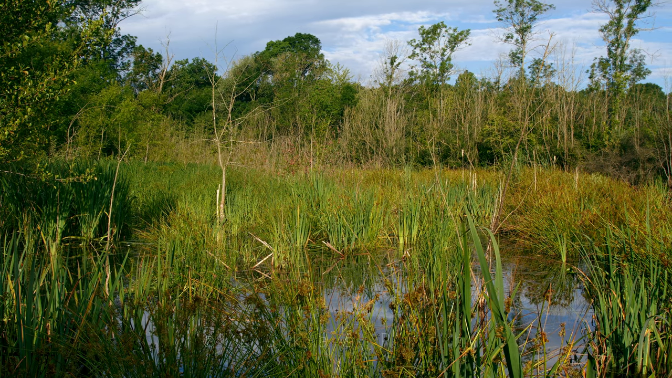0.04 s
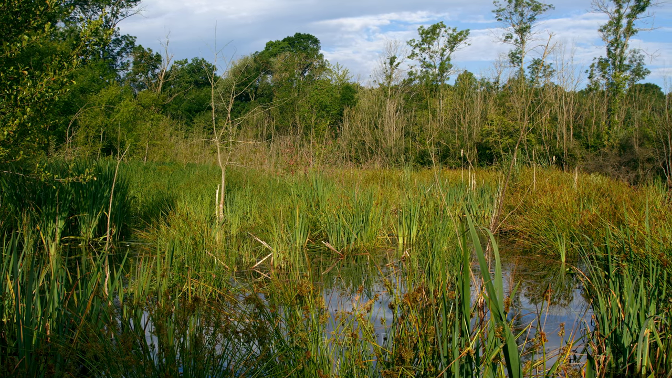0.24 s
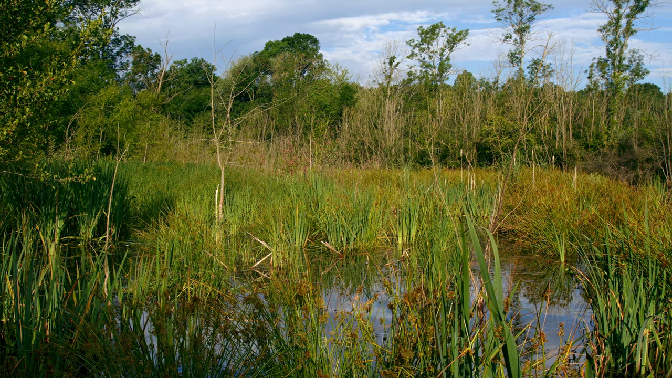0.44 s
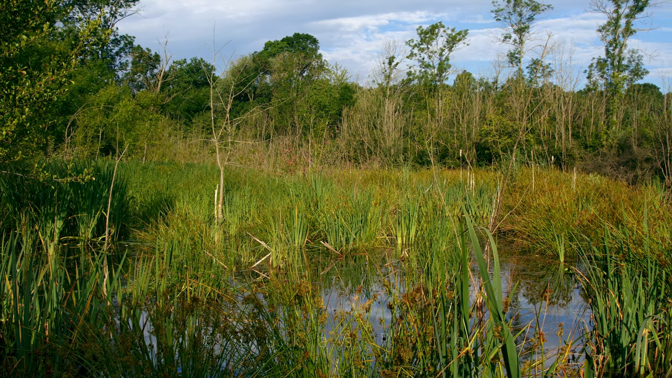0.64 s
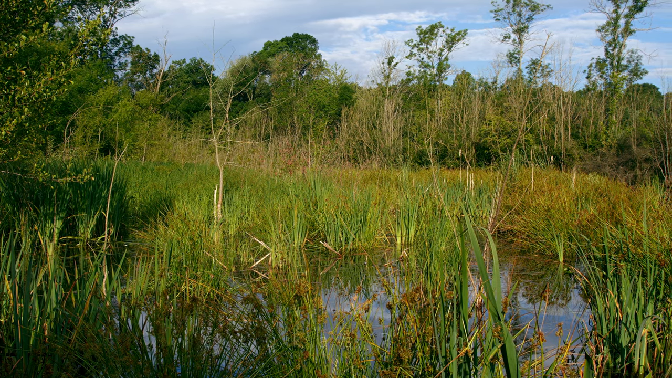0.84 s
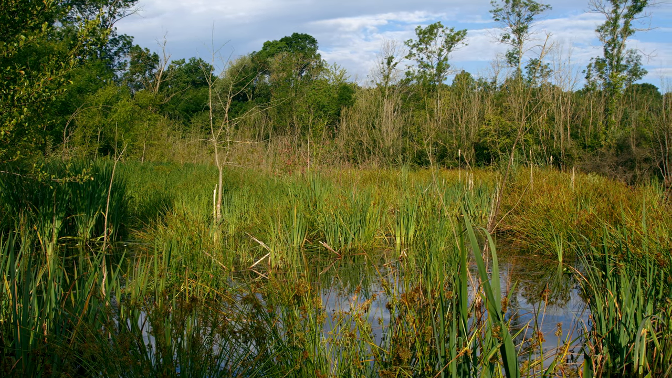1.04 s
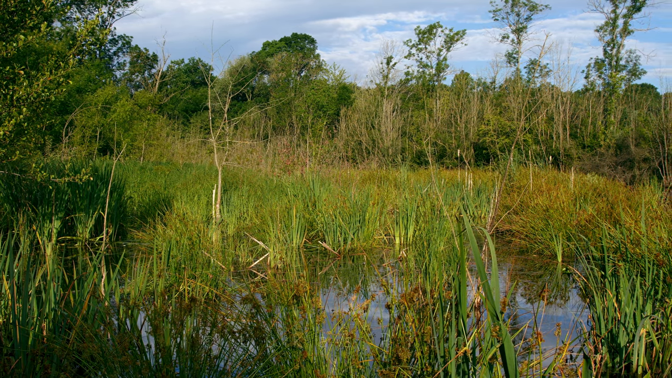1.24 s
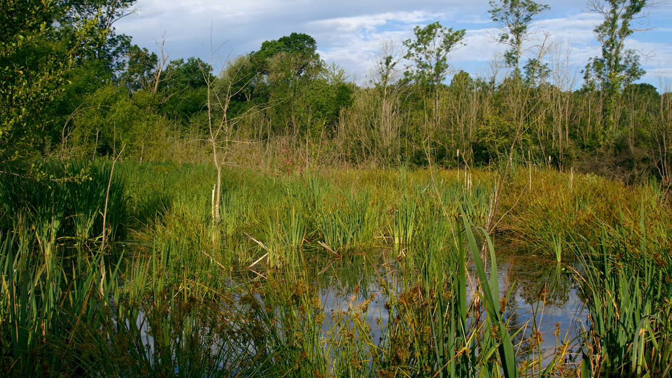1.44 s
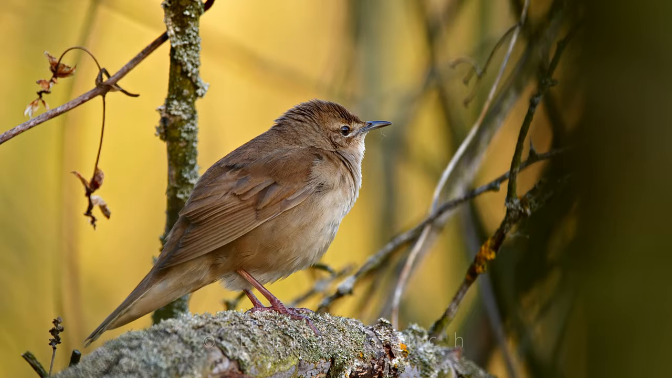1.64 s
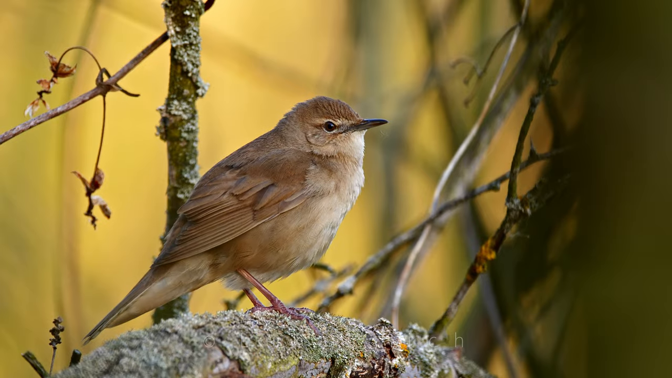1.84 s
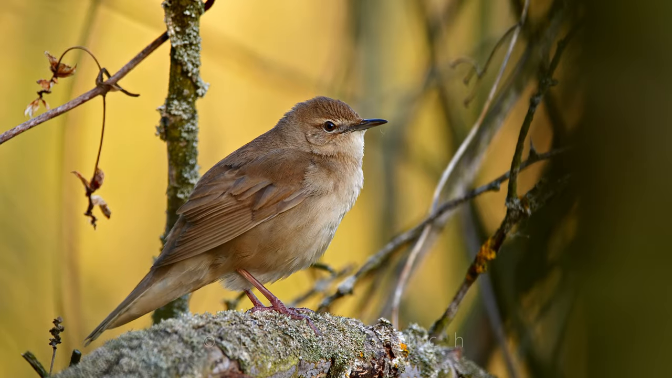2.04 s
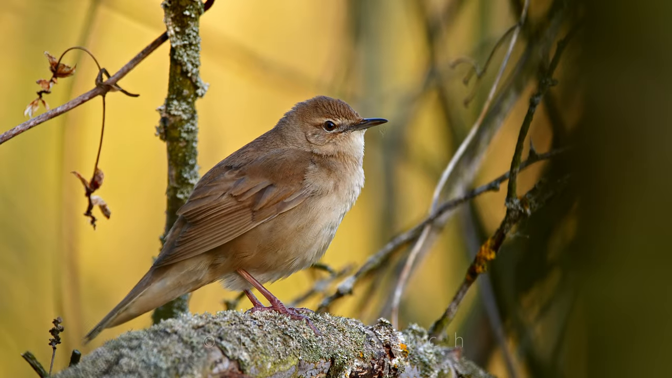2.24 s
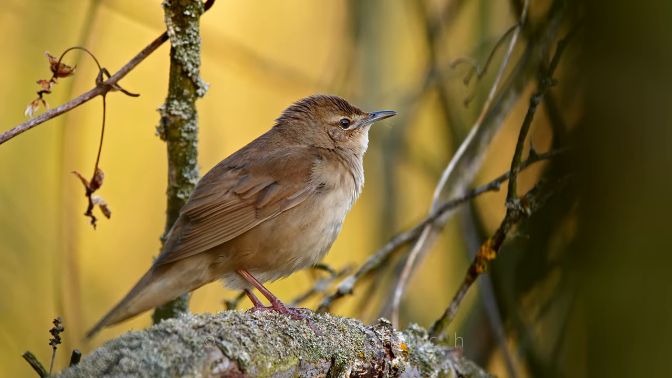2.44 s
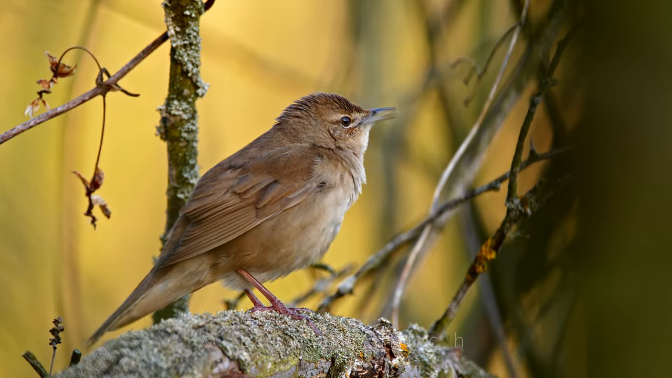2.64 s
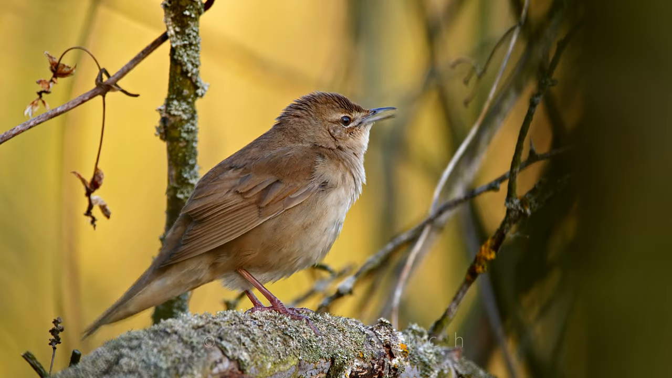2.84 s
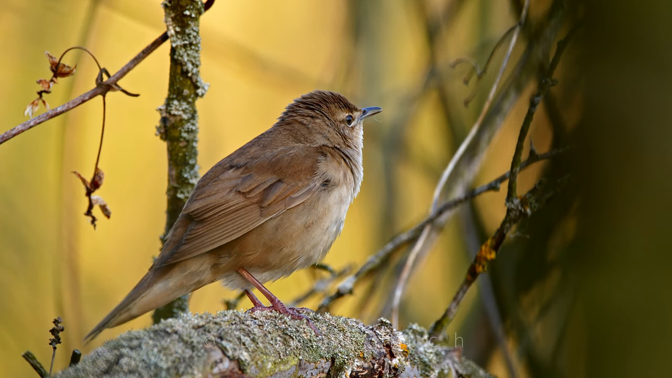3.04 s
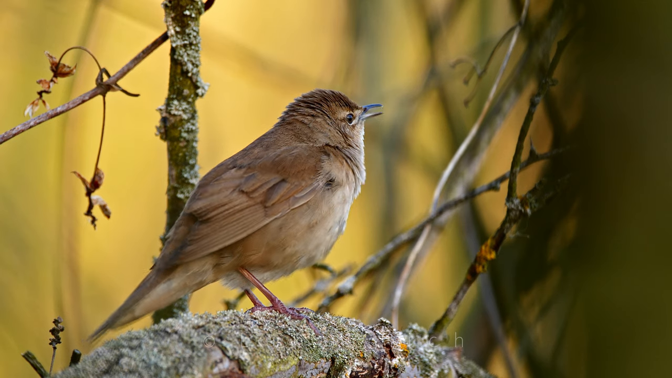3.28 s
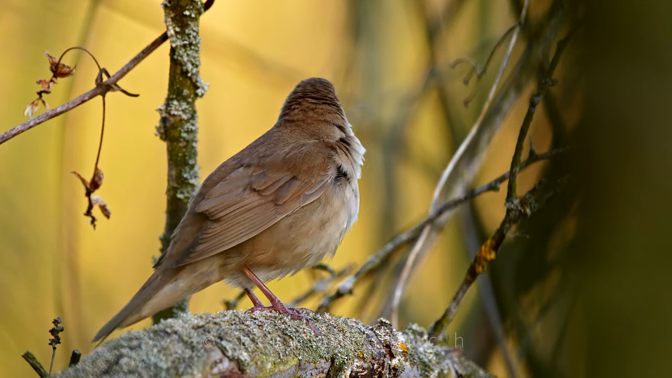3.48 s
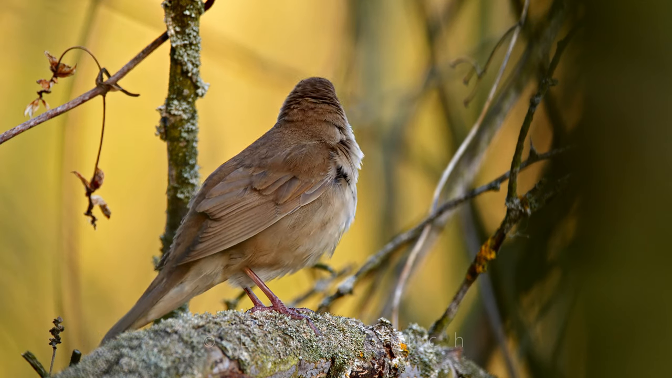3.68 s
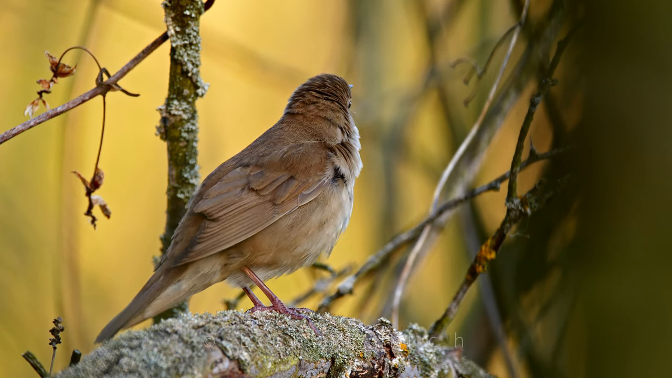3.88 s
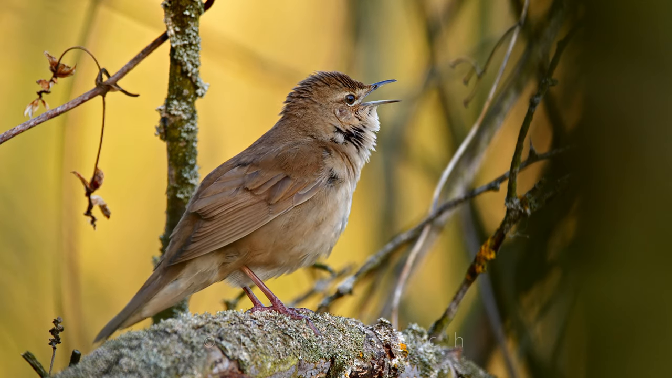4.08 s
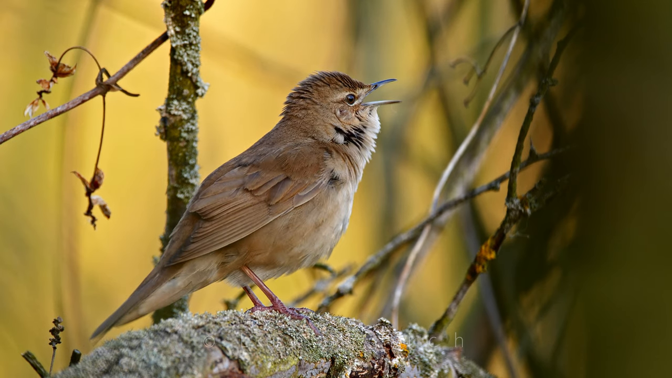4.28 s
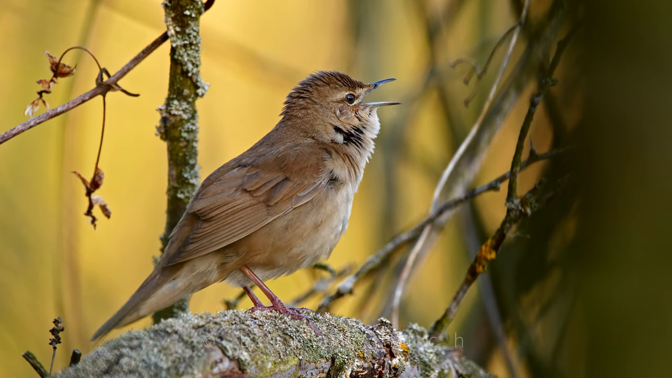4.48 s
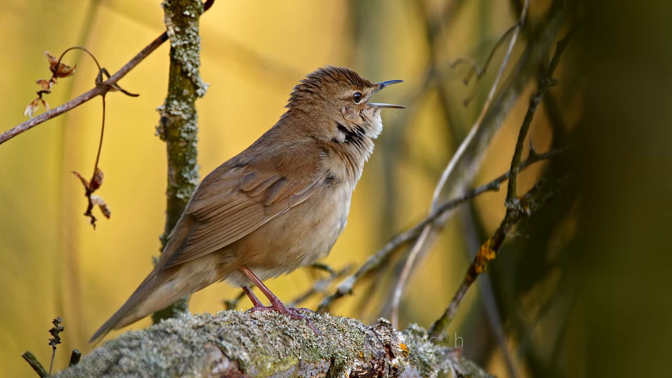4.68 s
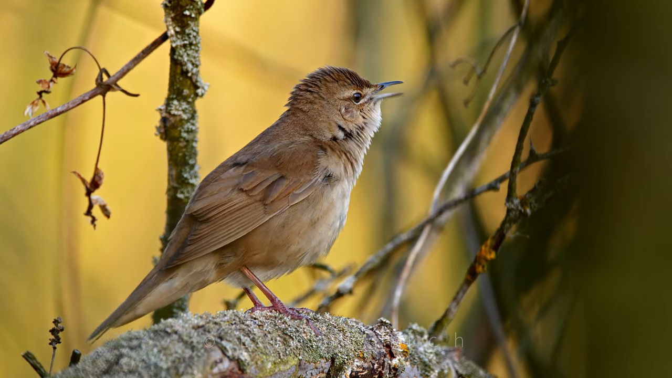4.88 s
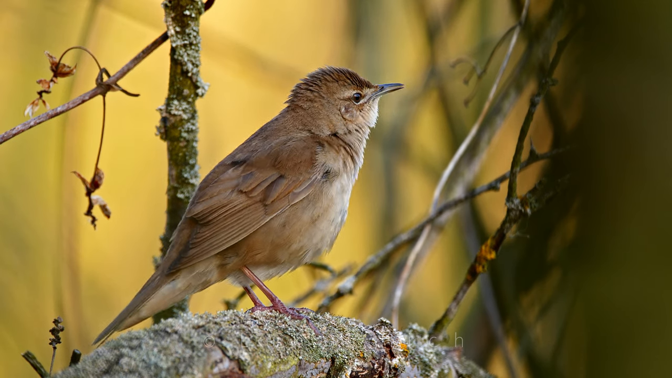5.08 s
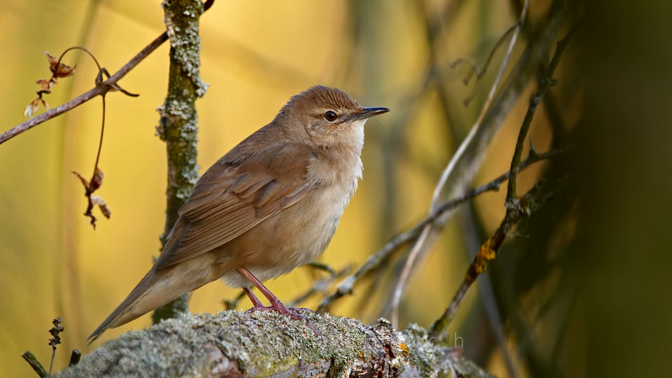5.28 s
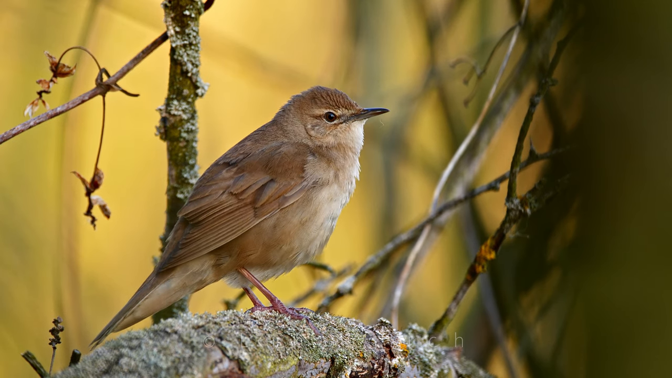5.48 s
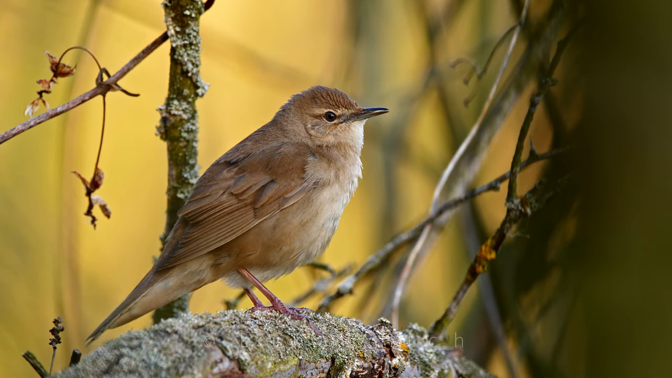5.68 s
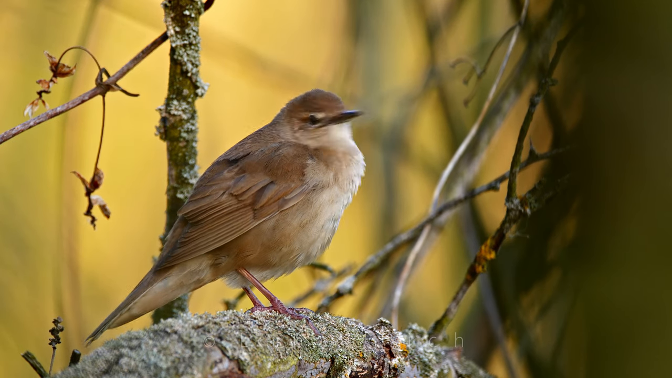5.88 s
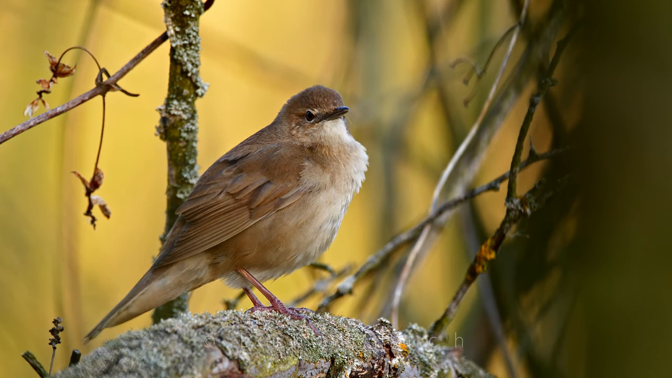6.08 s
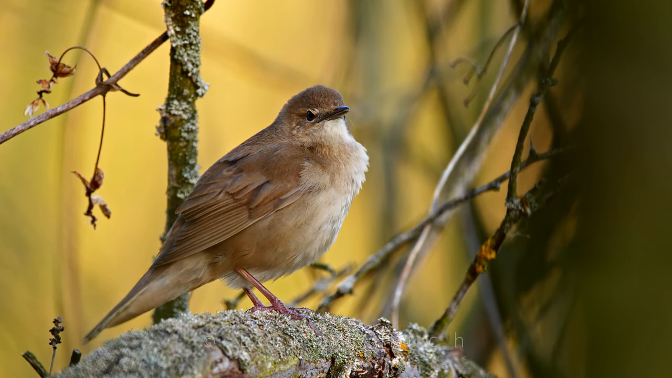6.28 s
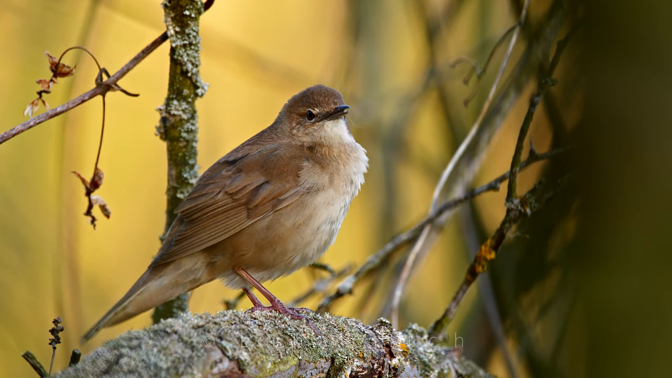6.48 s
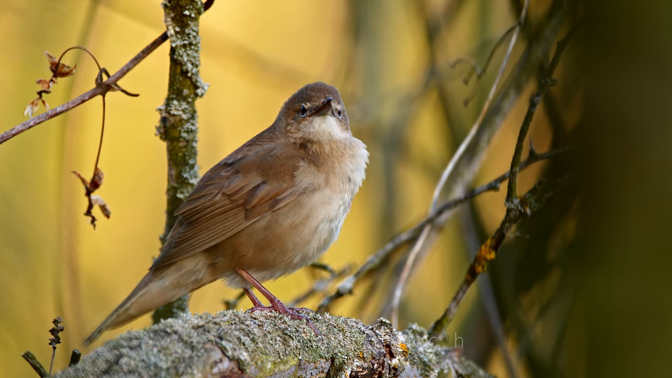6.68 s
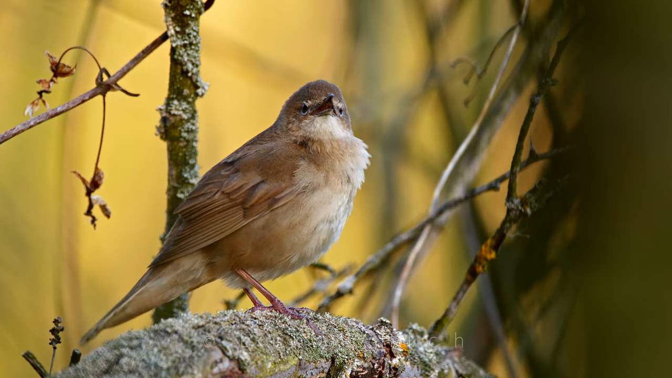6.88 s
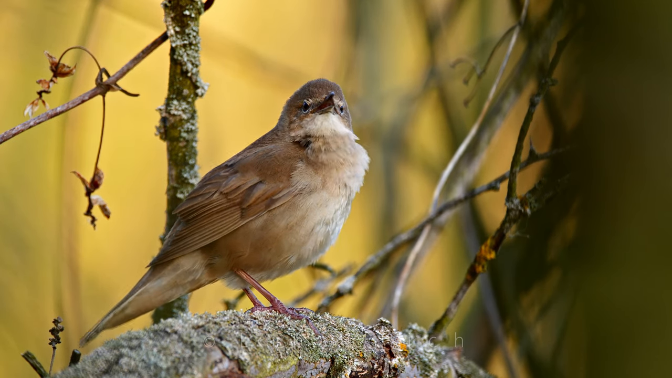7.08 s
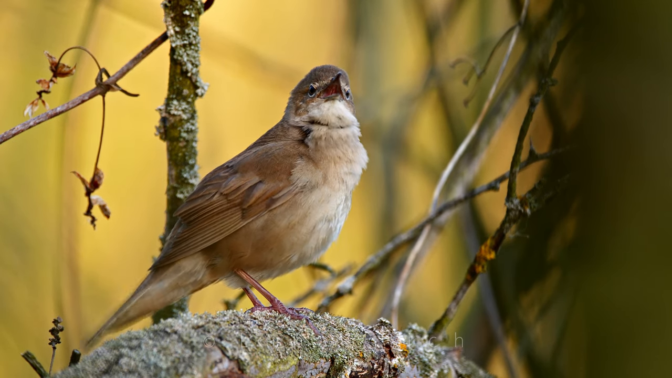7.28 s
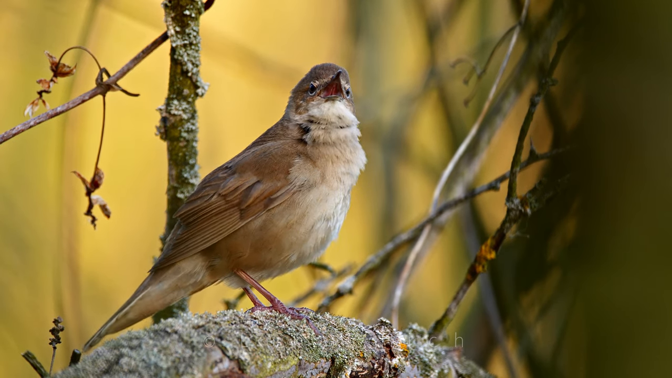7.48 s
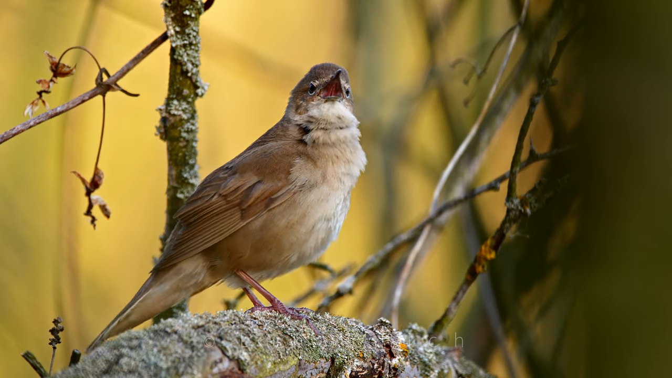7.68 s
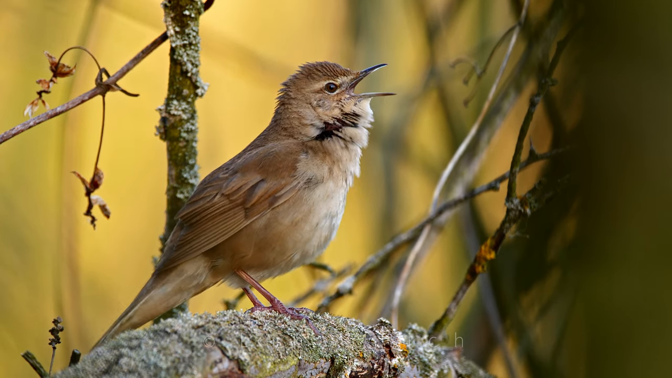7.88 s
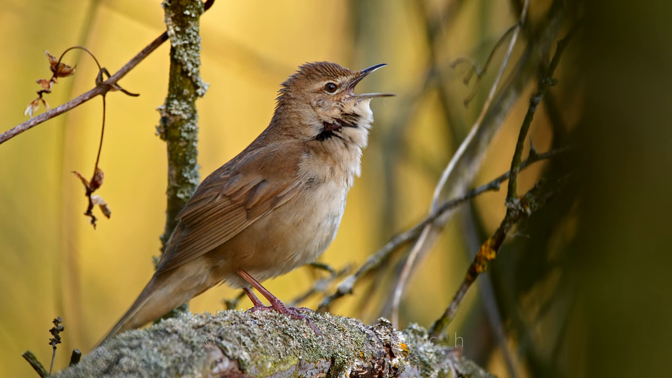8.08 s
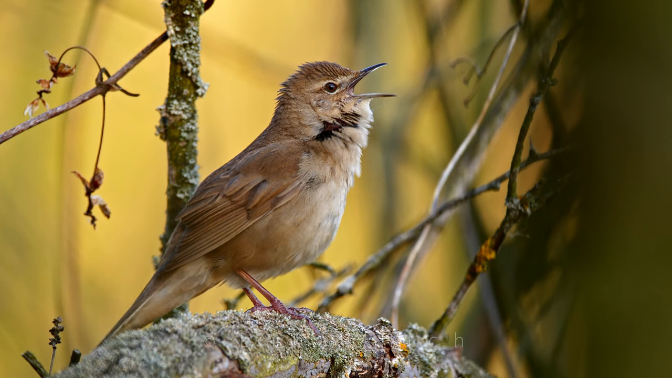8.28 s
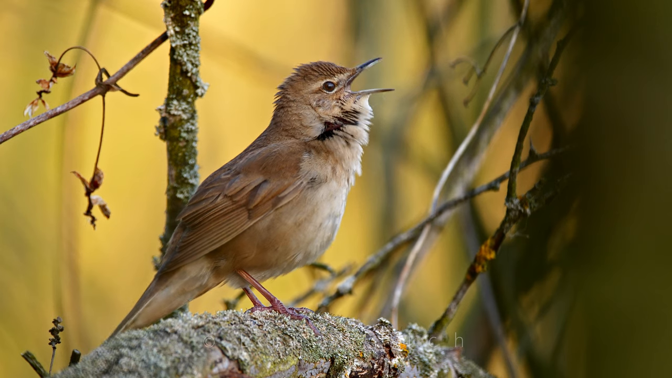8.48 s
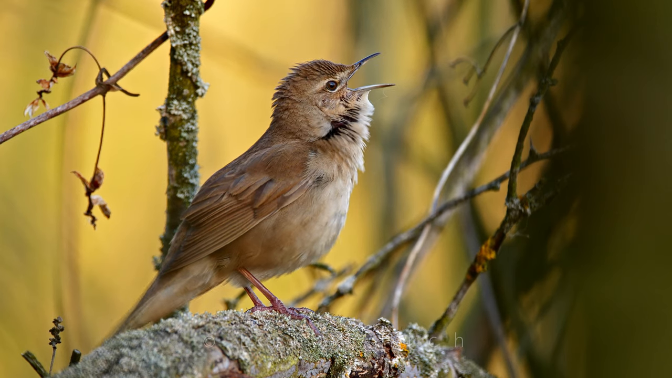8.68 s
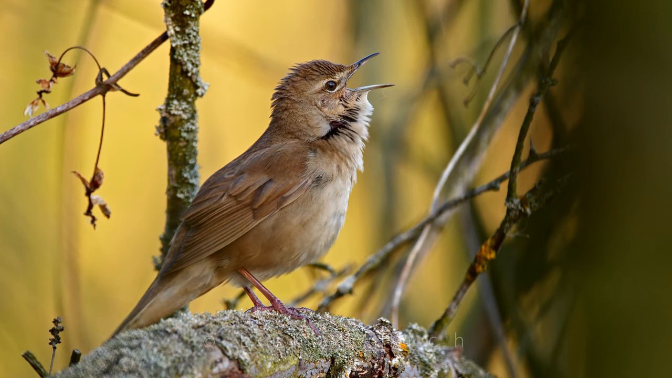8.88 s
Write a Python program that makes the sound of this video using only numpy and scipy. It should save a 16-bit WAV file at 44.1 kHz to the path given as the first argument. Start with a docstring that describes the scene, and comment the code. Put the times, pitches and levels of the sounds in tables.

```python
"""A warbler reels in a marsh: three bouts of double pulses, each an upswept click and a nearly level note.
Quickening chips, low sweeps with raspy harmonics, lead in the later two bouts; water and reeds return echoes.
Other birds whistle (curved sines), flute, churr (clicks through resonances), buzz and trill (fast modulation).
The place changes shortly after the first bout: a far reeler, blurred into a band near 4 kHz, and chatter enter.
Shaped noise gives the soft open-air floor and a low rumble."""
import sys
import numpy as np
from scipy import signal
from scipy.fft import rfft, irfft
from scipy.io import wavfile

SR = 44100
rng = np.random.default_rng(int(sys.argv[2]) if len(sys.argv) > 2 else 0)


def to_linear_factor(level_db):
    """Convert decibel levels (scalar or array-like) to linear amplitude factors."""
    exponent = np.asarray(level_db, float) / 20
    return 10 ** exponent


def wav_record(signal):
    """Record a signal, one row per channel, as 16-bit PCM in the file named by sys.argv[1]."""
    frames = np.transpose(np.atleast_2d(signal))
    bounded = np.clip(frames, -1, 1)
    # unit amplitude maps onto the largest positive 16-bit level
    quanta = np.round(bounded * 32767).astype(np.int16)
    wavfile.write(sys.argv[1], SR, quanta)


N = 393372


def rms_one(x):
    """Normalisation: scale to unit rms."""
    return x / np.sqrt(np.mean(x ** 2) + 1e-20)


def in_time(rows):
    """Linear interpolation: the columns of a curve table at every sample."""
    s, *columns = np.transpose(rows)
    return [np.interp(np.arange(N) / SR, s, column) for column in columns]


def add(out, s, sound):
    """Superposition: mix a short sound in at a time in seconds."""
    i = round(s * SR)
    a, b = max(i, 0), min(i + sound.shape[-1], N)
    if b > a:
        out[..., a:b] += sound[..., a - i:b - i]


def band(x, low_hz, high_hz):
    """Band-pass filtering with steep skirts."""
    return signal.sosfilt(signal.butter(4, [low_hz, high_hz], "band", fs=SR, output="sos"), x)


def scatter(x, t60):
    """Reverberation: many weak returns form a decaying noise tail of unit energy."""
    t = np.arange(SR // 2) / SR
    tail = rng.standard_normal(len(t)) * to_linear_factor(-60 * t / t60) * np.minimum(t / 0.013, 1)
    return signal.fftconvolve(x, tail / np.sqrt(np.sum(tail ** 2)))[:N]


def voiced(hz, start, envelope, wide):
    """Harmonic series: rows are the fundamental, then harmonics 2 and 3 under an envelope of their own."""
    phase = start + 2 * np.pi * np.cumsum(hz) / SR
    return np.array([envelope * np.sin(phase), wide * np.sin(2 * phase), wide * np.sin(3 * phase)])


def reel(pulses, lag_s, fade_s, spread_db, jitter_s, loose, edge_db=0):
    """Pulse train: each cycle is a fast upward click, then a note; rows: tone, harmonics at unit height."""
    out = np.zeros((3, N))
    t = np.arange(-220, 660) / SR
    # the click shoots up, then levels off
    rise = 1.17 * (1 - np.exp(-np.maximum(t + 0.0022, .0002) / 0.001138))
    onset = to_linear_factor(-25.5) * np.exp(-.5 * ((t + 0.0012) / 0.00032) ** 2)
    sharp = np.exp(-.5 * (t / 0.0007) ** 2) + onset
    wide = np.exp(-.5 * ((t + .0015) / .0012) ** 2)
    lucks = rng.standard_normal((len(pulses), 8))
    for (s, click_db, note_db, click_hz, note_hz), luck in zip(pulses, lucks):
        at = s - .0004 + t[0] + jitter_s * luck[2]
        click_pitch = click_hz * (1 + loose * luck[0]) * rise
        click = voiced(click_pitch, luck[1], to_linear_factor(click_db) * sharp, wide)
        add(out, at, to_linear_factor(spread_db * luck[3]) * click)
        # quick rise, slower fall
        swell = np.exp(-.5 * (t / np.where(t < 0, .0007, fade_s * to_linear_factor(0.75 * luck[7]))) ** 2)
        # scoops up into the note
        note_pitch = note_hz * (1 + loose * luck[4]) * (1 + 41.8 * np.minimum(t, 0))
        edge = to_linear_factor(np.minimum(note_db - click_db, 0) + edge_db) * swell ** 2
        note = voiced(note_pitch, .5 * luck[5], to_linear_factor(note_db) * swell, edge)
        add(out, at + lag_s, to_linear_factor(spread_db * luck[6]) * note)
    return out


CLICK_HZ_PER_DB = 48   # the click is higher when louder
FULL_EFFORT_DB = -12   # click level at which VOICE holds
THIRD_FOLLOWS = 1.2   # dB of third harmonic per dB of click
BRIGHT_START_S = 0.091   # decay constant of the extra second harmonic at a bout's start


def bout(pace, effort, voice, lag_s, fade_s):
    """Level-dependent timbre: click pitch and harmonic levels follow the effort."""
    click_hz, note_hz, second_db, third_db, bright_db, edge_db = voice
    s, number = np.transpose(pace)
    beats = np.interp(np.arange(1, number[-1] + 1), number, s)
    click_db, note_db = in_time(effort)
    at = (beats * SR).astype(int)
    pitch = click_hz + CLICK_HZ_PER_DB * np.maximum(click_db[at] - FULL_EFFORT_DB, -14.0)
    pulses = np.transpose([beats, click_db[at], note_db[at], pitch, note_hz + 0 * beats])
    tone, second, third = reel(pulses, lag_s, fade_s, 1.0, .00006, .004, edge_db)
    start_db = bright_db * np.exp(-np.maximum(np.arange(N) / SR - s[0], 0) / BRIGHT_START_S)
    third_db = third_db + FULL_EFFORT_DB + THIRD_FOLLOWS * (click_db - FULL_EFFORT_DB)
    return np.array([tone, to_linear_factor(second_db + click_db + start_db) * second, to_linear_factor(third_db) * third])


# pulse timing of each bout, slowing as it goes: t/s, number of the double pulse
BOUT_PACE = [
    [(-0.0121, 0), (1.0898, 52), (1.177, 56)],
    [(3.6435, 0), (3.8569, 12), (4.0002, 20), (4.145, 28), (4.292, 36), (4.6621, 56), (4.7377, 60),
     (4.8147, 64), (4.8945, 68)],
    [(6.9845, 0), (7.1261, 8), (7.5614, 32), (7.7825, 44), (8.1552, 64), (8.6837, 92), (8.9117, 104)],
]
# effort curve of each bout: t/s, click level/dB, note level/dB
BOUT_EFFORT = [
    [(0.0, -12, -14.5), (0.25, -13.9, -12.5), (1.09, -14.5, -15), (1.18, -18.5, -17)],
    [(3.64, -37, -56), (3.79, -25, -33), (4.14, -18.5, -32), (4.23, -17.5, -17.5), (4.55, -15, -17.5),
     (4.74, -13, -9), (4.9, -16.5, -17)],
    [(6.98, -26.5, -45), (7.13, -23, -50), (7.3, -15, -33), (7.42, -14.5, -25.5), (7.58, -11.5, -15),
     (7.8, -11, -12.5), (8.92, -9.5, -8)],
]
# voice of each bout: click f/Hz at full effort and mid-click, note f/Hz, second harmonic level/dB re click,
# third harmonic level/dB re full effort, bright start level/dB, note harmonics re click harmonics level/dB
BOUT_VOICE = [(4384, 4135, -26, -27.5, 2.5, -3), (4152, 3870, -25, -32, 23, -12),
              (3918, 3860, -23, -30.5, 25.5, -11)]
# delay from click to note in each bout: t/s
BOUT_NOTE_LAG = [.0073, .0071, .0069]
# typical Gaussian fall time of the note in each bout: t/s
BOUT_NOTE_FADE = [0.0012, 0.001, 0.0035]
THROAT_LEAK_DB = -9   # what passes outside the throat's band


def warbler():
    """Source and filter: a throat band shapes the tone; breath noise modulates the harmonics; chips join."""
    parts = zip(BOUT_PACE, BOUT_EFFORT, BOUT_VOICE, BOUT_NOTE_LAG, BOUT_NOTE_FADE)
    tone, second, third = sum(bout(*part) for part in parts)
    throat = signal.butter(3, [3350, 5000], "band", fs=SR, output="sos")
    passed = signal.sosfiltfilt(throat, tone)
    tone = passed + to_linear_factor(THROAT_LEAK_DB) * (tone - passed)
    breath = [rms_one(band(rng.standard_normal(N), 100, 2600)) for _ in range(2)]
    # the two bands leave a gap near 10 kHz
    second = band(second * (1 + .5 * breath[0]), 4600, 8500)
    third = band(third * (1 + 0.7 * breath[1]), 11840, 17400)
    blur = to_linear_factor(-10.0) * scatter(second + third, .05)
    return band(chips(), 1000, 13200) + tone + second + third + blur


def coloured(spectrum):
    """Spectral shaping: noise weighted by a level curve over log frequency, rms 1."""
    hz, points = np.fft.rfftfreq(N, 1 / SR) + 1, np.array(spectrum)
    weight = to_linear_factor(np.interp(np.log(hz), np.log(points[:, 0]), points[:, 1]))
    return rms_one(irfft(rfft(rng.standard_normal(N)) * weight, N))


# spectrum of the open-air floor: f/Hz, relative level/dB
FLOOR_SPECTRUM = [(150, -72), (320, -34.5), (400, -16), (600, -1.5), (1400, -3.5), (2400, -4), (3200, 8),
                  (5200, 0.5), (6500, -10.5), (9000, -20.5), (12000, -19.5), (15500, -22)]
# spectrum of the low rumble: f/Hz, relative level/dB
RUMBLE_SPECTRUM = [(15, -37), (25, -15.5), (59, -1), (129, -1), (194, -7.5), (263, -5.5), (330, -17.5),
                   (430, -38.5), (730, -120)]
# the air at the two places: t/s, floor level/dB, rumble level/dB before gusts
AIR_LEVELS = [(0.0, -46.5, -90), (1.15, -49.5, -90), (1.55, -51, -78), (1.9, -48, -73), (7.4, -48, -75),
              (8.92, -48, -73)]
GUSTS_DB, GUSTS_PER_S = 1.5, 4.0   # spread and rate of the random gust levels


def open_air():
    """Broadband noise: a steady-coloured floor, and a rumble whose level wanders with the gusts."""
    floor_db, rumble_db = in_time(AIR_LEVELS)
    gusts = np.interp(np.arange(N) / SR * GUSTS_PER_S, np.arange(60), rng.standard_normal(60))
    floor = to_linear_factor(floor_db) * coloured(FLOOR_SPECTRUM)
    return floor + to_linear_factor(rumble_db + GUSTS_DB * gusts) * coloured(RUMBLE_SPECTRUM)


def whistle(length, hz, waver, turn=0.557):
    """Frequency glide: a near sine on a smooth curve through three pitches, the middle at the share turn."""
    u = np.linspace(0, 1, round(length * SR))
    curve = np.polyfit([0, .5, 1], np.log(hz), 2)
    pitch = np.exp(np.polyval(curve, np.interp(u, [0, turn, 1], [0, .5, 1])))
    flutter_db = np.interp(u * length * 100, np.arange(50), waver)
    swell = np.abs(np.sin(np.pi * u ** .8)) ** .4
    return swell * to_linear_factor(flutter_db) * np.sin(2 * np.pi * np.cumsum(pitch) / SR)


# whistles by pitch contour, each row: t/s, length t/s, named f/Hz, level/dB
# falling steeply
TSIP_NOTES = [(0.03, 0.0066, 5560, -37), (0.247, .016, 5220, -23.5), (0.323, .014, 5750, -32),
              (0.393, 0.017, 5580, -34.5), (0.467, 0.0066, 5420, -30), (0.706, 0.0086, 5250, -24.5),
              (0.783, 0.014, 5320, -30.5), (0.861, .017, 5830, -33.5), (1.188, 0.0068, 5240, -31.5),
              (1.27, 0.012, 5000, -43), (1.283, 0.022, 5400, -44), (1.636, 0.067, 5470, -46.5),
              (2.119, 0.01, 6300, -48), (2.552, 0.0099, 5870, -42), (2.642, 0.0091, 6000, -45),
              (2.746, .012, 5800, -49.5), (3.047, .016, 4540, -31.5), (3.903, .028, 4050, -40),
              (5.1, 0.0095, 5760, -49)]
# falling, then nearly level
HOOK_NOTES = [(1.973, .015, 5850, -41), (2.491, .016, 5790, -37.5), (3.271, 0.024, 5700, -33.5),
              (4.158, 0.019, 5690, -33.5), (4.785, 0.0063, 5670, -25)]
# falling, then rising again
DIP_NOTES = [(2.044, 0.11, 3010, -44.5), (2.673, .11, 2880, -46), (3.209, 0.06, 2700, -42),
             (3.656, 0.098, 2810, -45.5), (5.151, 0.11, 2920, -43.5), (5.655, 0.1, 2946, -40),
             (6.19, 0.13, 2870, -45)]
# falling the furthest
SLUR_NOTES = [(0.05, 0.017, 2530, -43), (0.74, 0.013, 2450, -45), (1.0, 0.055, 2340, -41.5),
              (3.079, 0.1, 2000, -52), (3.798, 0.016, 1660, -52), (3.935, 0.1, 2185, -41),
              (4.436, .012, 1680, -50), (4.582, 0.092, 2130, -41.5), (4.942, 0.018, 2550, -38.5),
              (6.692, .014, 2840, -32.5)]
# rising
RISE_NOTES = [(0.32, .03, 2950, -46), (0.964, 0.023, 2000, -48), (1.269, 0.051, 2690, -43.5),
              (3.765, 0.018, 4470, -34), (7.189, .039, 1660, -54)]
# nearly level
LEVEL_NOTES = [(0.2, 0.056, 672, -56), (0.6, 0.066, 1486, -58), (0.84, 0.056, 807, -57),
               (0.95, 0.071, 1340, -59), (1.071, 0.29, 1510, -58.5), (1.1, 0.19, 778, -58),
               (1.11, 0.0063, 5480, -32), (1.472, 0.0079, 2410, -44), (1.498, .012, 5700, -41),
               (1.506, 0.038, 6030, -46.5), (1.851, 0.074, 2920, -45), (2.427, 0.042, 2950, -43.5),
               (3.03, 0.046, 2280, -52), (3.263, .08, 2070, -61), (4.164, 0.035, 2950, -39),
               (4.446, 0.012, 2260, -42.5), (4.673, 0.046, 2930, -42), (4.9, 0.041, 2880, -44),
               (4.985, 0.013, 2230, -41), (5.03, .03, 5750, -55), (5.229, 0.055, 2880, -41.5),
               (5.616, 0.055, 2870, -46.5), (5.49, 0.013, 2260, -40)]
# falling gently
SAG_NOTES = [(0.585, .31, 5810, -39), (5.154, .034, 6500, -64)]
# contour of each kind: start f ratio, end f ratio, share of the length at which the named pitch is reached
CONTOURS = [(1.2, .84, .5), (1.13, 1.01, .45), (1.25, 1.24, .28), (1.3, .8, .4), (.88, 1.1, .5),
            (1.0, 1.01, .5), (1.11, .94, .5)]


def whistles():
    """Pitch contour: each kind of whistle scales one curve to its named pitch."""
    out = np.zeros(N)
    kinds = [TSIP_NOTES, HOOK_NOTES, DIP_NOTES, SLUR_NOTES, RISE_NOTES, LEVEL_NOTES, SAG_NOTES]
    for rows, (start, end, turn) in zip(kinds, CONTOURS):
        for (s, length, hz, db), waver in zip(rows, rng.normal(0, 1.5, (len(rows), 50))):
            add(out, s, to_linear_factor(db) * whistle(length, [start * hz, hz, end * hz], waver, turn))
    return out


# fluty notes: t/s, length t/s, start f/Hz, middle f/Hz, end f/Hz, relative level/dB
FLUTE_NOTES = [(0.1, .085, 1950, 2450, 2800, -47), (0.541, .07, 2250, 2550, 2900, -46),
               (7.3, .155, 2270, 2520, 2720, -31), (7.55, .15, 2350, 2430, 2800, -29),
               (7.868, .155, 2800, 2470, 2800, -33)]
FLUTE_LOW_DB, FLUTE_FADE_DB = -18, 24   # lower octave; fade in dB per length


def flutes():
    """Octave pair: a gliding tone, loudest a third of the way in, over a weak lower octave."""
    out = np.zeros(N)
    for (s, length, *hz, db), waver in zip(FLUTE_NOTES, rng.normal(0, 1.5, (len(FLUTE_NOTES), 50))):
        high = whistle(length, hz, waver, .36)
        fade_db = FLUTE_FADE_DB * np.abs(np.linspace(-.3, .7, len(high)))
        add(out, s, to_linear_factor(db + 3.0 - fade_db) * high)
        add(out, s, to_linear_factor(db + FLUTE_LOW_DB) * whistle(length, np.array(hz) / 2, waver, .36))
    return out


# harsh churrs: t/s, length t/s, level/dB
CHURR_NOTES = [(0.147, 0.036, -43.5), (0.584, 0.059, -48), (0.725, 0.015, -44), (0.985, .06, -55),
               (1.305, 0.046, -49), (1.573, 0.021, -46), (2.055, 0.034, -43), (2.354, 0.024, -42.5),
               (2.559, 0.026, -40), (3.08, 0.068, -47), (3.52, 0.025, -55), (3.59, 0.032, -44),
               (5.46, 0.047, -52), (5.939, 0.018, -41), (6.252, 0.011, -39), (6.766, 0.0086, -49),
               (6.97, 0.035, -41)]
# throat resonances: f/Hz, bandwidth f/Hz, relative level/dB
CHURR_RESONANCES = [(1298, 67, 7), (1720, 175, 8.5), (2470, 450, 8.5), (3070, 110, -31)]


def churrs():
    """Formant resonance: uneven quick clicks excite a few throat resonances."""
    clicks = (rng.random(N) < 1200 / SR) * rng.standard_normal(N)
    voice, gate = np.zeros(N), np.zeros(N)
    for hz, width, db in CHURR_RESONANCES:
        r = np.exp(-np.pi * width / SR)   # pole radius
        poles = [1, -2 * r * np.cos(2 * np.pi * hz / SR), r * r]
        voice += to_linear_factor(db) * signal.lfilter([1 - r, 0, r - 1], poles, clicks)
    for s, length, db in CHURR_NOTES:
        add(gate, s, to_linear_factor(db) * np.sqrt(np.hanning(round(length * SR))))
    return gate * rms_one(voice)


# far birds: t/s, far reeler level/dB, chatter level/dB
FAR_LEVELS = [(1.2, -46, -74), (1.4, -49, -60), (1.75, -38, -52.5), (3.58, -36.5, -51), (3.72, -41, -56),
              (4.4, -36.5, -56.5), (5.1, -38.5, -65.5), (5.4, -37.5, -55.5), (5.9, -38.5, -54),
              (6.05, -36, -44.5), (6.4, -38, -58), (6.85, -36.5, -47), (7.12, -37, -51), (7.25, -38, -49)]


def far_birds():
    """Diffuse field: scatter blurs a distant reeler and many short low chatter notes."""
    reeler_db, chatter_db = in_time(FAR_LEVELS)
    beats = np.arange(0, N / SR, 1 / 50.6)   # 50.6 pulses per s
    pulses = [(s, -1.0, 0, 4250, 4120) for s in beats]
    reels = reel(pulses, 0.0088, 0.0018, 2.5, .0004, 0.022)[0]
    reeler = rms_one(to_linear_factor(-5.0) * reels + scatter(reels, 0.84))
    chatter = np.zeros(N)
    for s, length, a, b, size in rng.random((1800, 5)):
        hz = 2400 * np.exp(0.387 * (a - .5) + .5 * (b - .5) * np.array([-1, 0, 1]))
        note = whistle(.003 + .006 * length, hz, np.zeros(50))
        add(chatter, s * N / SR, to_linear_factor(-8 * size) * note)
    chatter = rms_one(chatter + scatter(chatter, .12))
    arrived = np.clip((np.arange(N) / SR - 1.15) / 0.15, 0, 1)   # heard only at the second place
    return arrived * (to_linear_factor(reeler_db) * reeler + to_linear_factor(chatter_db) * chatter)


def buzz(length, start_hz, end_hz, throbs, bend):
    """Frequency and amplitude modulation: pitch and level throb fast and unevenly."""
    u = np.linspace(0, 1, round(length * SR))
    pace = throbs * (1 + 0.13 * np.interp(u, np.linspace(0, 1, 12), rng.standard_normal(12)))
    throb = 2 * np.pi * np.cumsum(pace) / SR
    pitch = end_hz + (start_hz - end_hz) * (1 - u) ** bend + 1.55 * throbs * np.cos(throb)
    swell = np.abs(np.sin(np.pi * u)) ** .4
    return swell * (1 + 0.36 * np.sin(throb)) * np.sin(2 * np.pi * np.cumsum(pitch) / SR)


# short trills and rasps: t/s, length t/s, start f/Hz, end f/Hz, mean throb f/Hz, level/dB
TRILL_NOTES = [(1.3, 0.11, 4350, 4520, 56, -32.5), (1.298, 0.049, 3800, 3950, 127, -33.5),
               (1.546, 0.0094, 4500, 4500, 105, -30.5), (2.906, 0.037, 4700, 4900, 250, -34.5),
               (3.108, .022, 2540, 2740, 250, -36.5), (3.235, 0.015, 2510, 2590, 260, -35),
               (3.472, 0.02, 2390, 2600, 250, -33.5), (3.612, 0.02, 2520, 2620, 160, -32),
               (3.735, 0.052, 5200, 5900, 520, -41.5), (4.383, 0.023, 4940, 5720, 200, -41.5),
               (8.74, 0.028, 5600, 5370, 200, -35), (8.843, 0.05, 5620, 5460, 230, -35)]


def trills():
    """Modulation rate: slow throbs are heard as a trill, fast ones as a rasp."""
    out = np.zeros(N)
    for s, length, start_hz, end_hz, throbs, db in TRILL_NOTES:
        add(out, s, to_linear_factor(db) * buzz(length, start_hz, end_hz, throbs, bend=1.86))
    return out


# lead-in chips of the warbler: t/s, relative treble level/dB, relative low sweep level/dB
CHIP_NOTES = [(1.9485, -47, -34), (2.116, -52, -35.5), (2.2337, -45.5, -31.5), (2.525, -47.5, -34),
              (2.6926, -50, -34), (2.8102, -45.5, -31), (2.8886, -42, -31), (2.989, -44.5, -33),
              (3.0992, -46, -37), (3.1878, -46.5, -32), (3.265, -47, -32), (3.339, -44, -32.5),
              (3.41, -42.5, -31.5), (3.476, -43.5, -29.5), (3.55, -38, -30), (3.6118, -38.5, -29.5),
              (5.23, -51, -31.5), (5.7044, -47.5, -34.5), (5.872, -47, -35), (5.9897, -44.5, -31),
              (6.0736, -42, -31), (6.1696, -44.5, -32), (6.2836, -49, -35), (6.3712, -45.5, -32.5),
              (6.4462, -44.5, -32), (6.5191, -43.5, -32), (6.5907, -42, -31.5), (6.6576, -44, -33),
              (6.729, -37, -30.5), (6.795, -39.5, -31), (6.8497, -41.5, -32), (6.9129, -37, -31.5),
              (6.9611, -38, -37)]


def chips():
    """Noise-modulated harmonics: a low upward sweep with raspy overtones far into the treble."""
    out, t = np.zeros(N), np.arange(660) / SR
    for (s, treble_db, low_db), start in zip(CHIP_NOTES, rng.uniform(0, 7.45, len(CHIP_NOTES))):
        phase = start + 2 * np.pi * np.cumsum(1350 + 1900 * (1 - np.exp(-t / 0.0055))) / SR
        low = np.exp(-.5 * ((t - .0048) / 0.0027) ** 2) * np.sin(phase)
        stack = sum(to_linear_factor(db) * np.sin(k * phase) for k, db in zip(range(2, 7), [8, 6, -7, -12, -12]))
        roughness = 1 + 0.9 * rng.standard_normal(len(t))
        rasp = np.exp(-.5 * ((t - .005) / 0.0028) ** 2) * stack * roughness
        add(out, s - .003, to_linear_factor(low_db + 1.0) * low + to_linear_factor(treble_db - 11.0) * rasp)
    return out


# falling buzzes of one bird: t/s, start f/Hz, end f/Hz, level/dB
BUZZ_NOTES = [(5.251, 6170, 5040, -29.5), (5.662, 6040, 4730, -30), (6.222, 5920, 4630, -29.5),
              (6.783, 5710, 4780, -27), (7.555, 5640, 4660, -25), (8.177, 5940, 4580, -26.5)]
BUZZ_S, BUZZ_THROBS_PER_S = 0.087, 180   # length, mean throb rate


def buzzes():
    """Modulated glide: one bird's falling notes throb too fast to count."""
    out = np.zeros(N)
    for s, start_hz, end_hz, db in BUZZ_NOTES:
        add(out, s, to_linear_factor(db) * buzz(BUZZ_S, start_hz, end_hz, BUZZ_THROBS_PER_S, bend=3.3))
    return out


ECHO_S, ECHO_DB = .0035, -11   # bounce off the water
REEDS_T60_S, REEDS_DB = 0.22, -10   # scatter from the reed bed


def scene():
    """Superposition: direct sound, one reflection off the water, scatter, far birds and air."""
    singer, echo = warbler(), np.zeros(N)
    add(echo, ECHO_S, to_linear_factor(ECHO_DB) * singer)
    others = whistles() + flutes() + band(churrs(), 810, 4140) + trills() + buzzes()
    wet = to_linear_factor(REEDS_DB) * scatter(singer, REEDS_T60_S) + to_linear_factor(-5.5) * scatter(others, 0.27)
    return (singer + echo + others + wet + far_birds() + open_air())[None]


def top_cut(x):
    """Nothing passes above the cut-off."""
    return signal.sosfilt(signal.butter(12, 15830, fs=SR, output="sos"), x)


def record(dry):
    """Signal chain: the finished mix goes through its one last stage."""
    return top_cut(dry)


dry = scene()
out = record(dry)
wav_record(out)
```